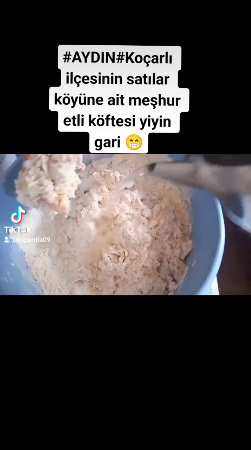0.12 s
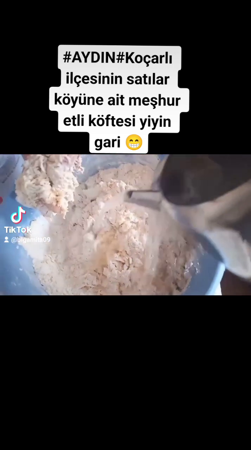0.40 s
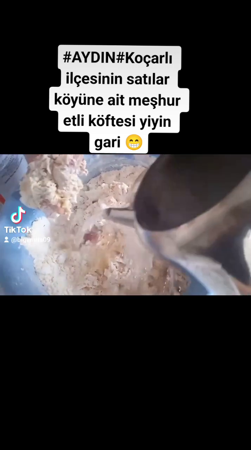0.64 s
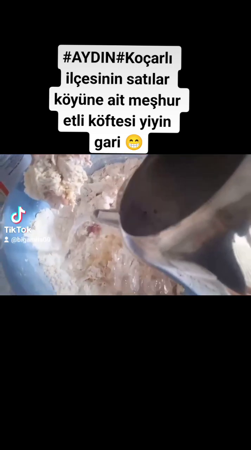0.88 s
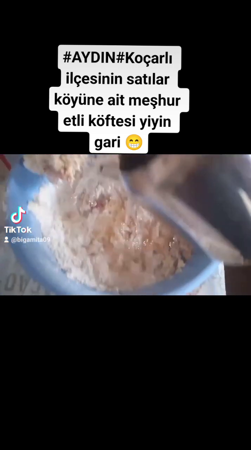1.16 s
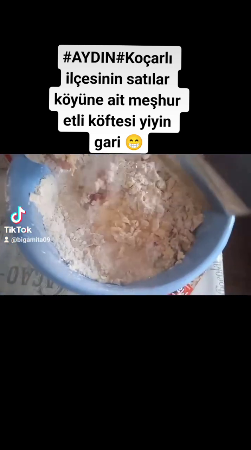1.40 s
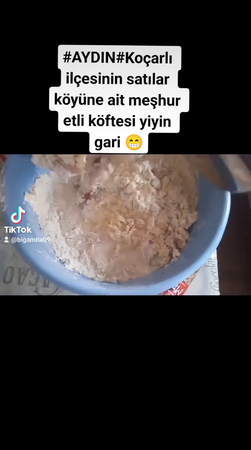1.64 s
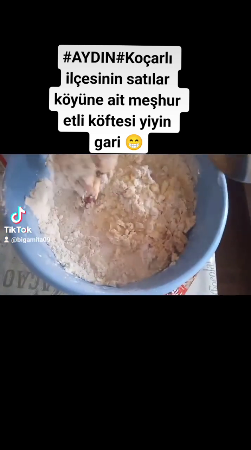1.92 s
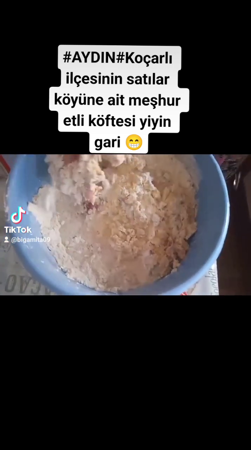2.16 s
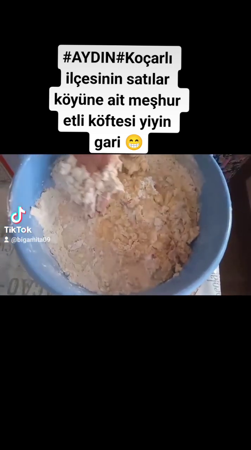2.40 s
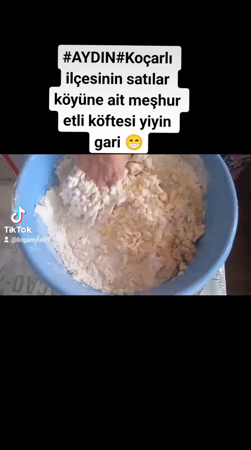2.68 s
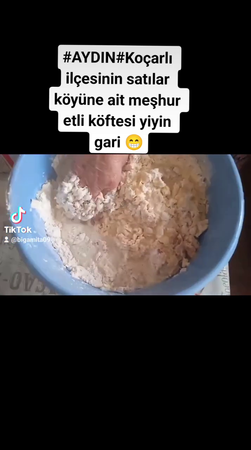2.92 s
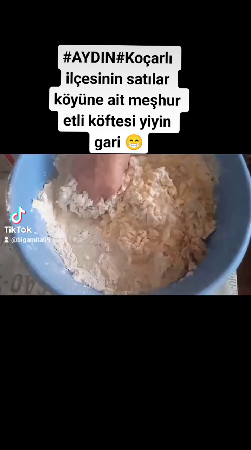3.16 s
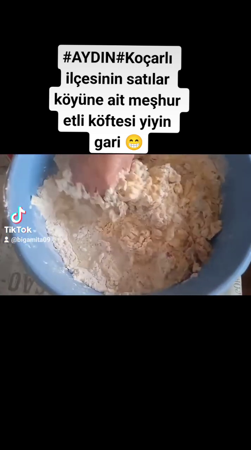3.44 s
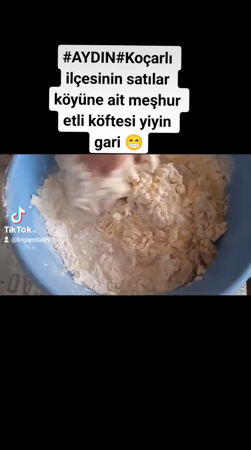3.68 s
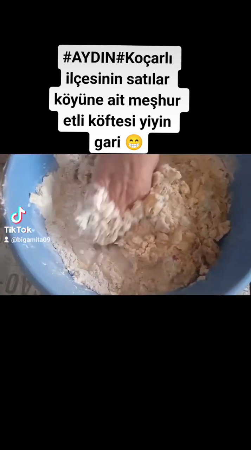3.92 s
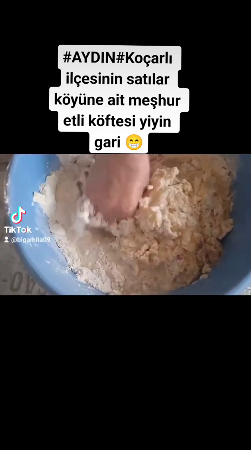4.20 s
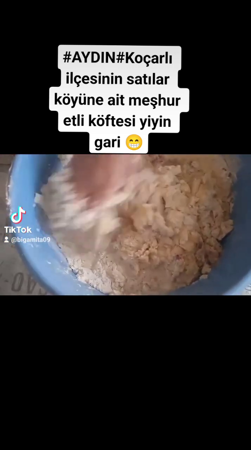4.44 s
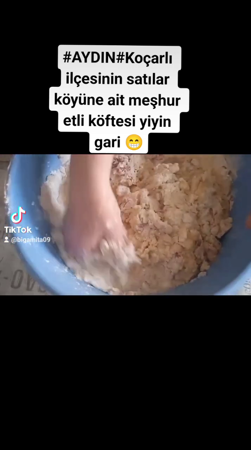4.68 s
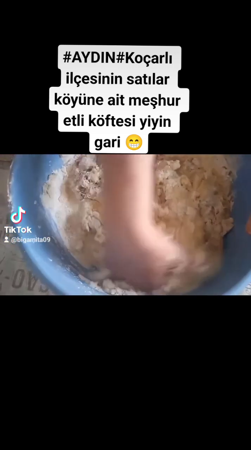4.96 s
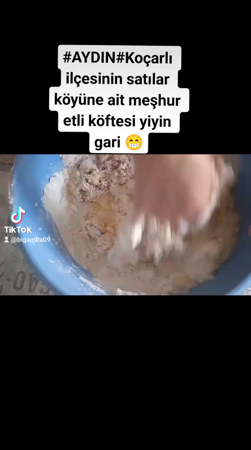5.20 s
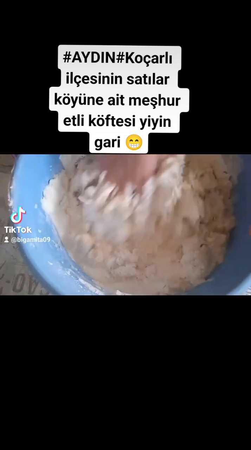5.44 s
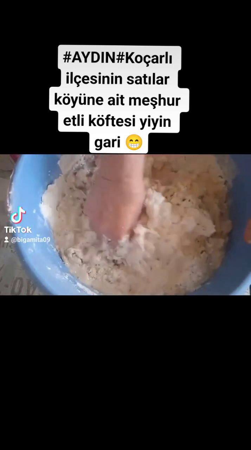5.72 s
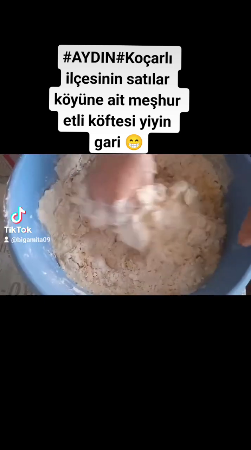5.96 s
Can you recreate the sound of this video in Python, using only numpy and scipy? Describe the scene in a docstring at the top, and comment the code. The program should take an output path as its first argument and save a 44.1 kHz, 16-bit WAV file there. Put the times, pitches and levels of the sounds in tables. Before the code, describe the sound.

A light, crackly pour of water onto flour peaks within the first second and dwindles into sparse, high, clicking drips. After a short lull a kettle lands across the room with woody thuds, then a brighter metallic clank and a little scraping. Quiet dry rubbing and sticky ticks follow close by as dough is mixed, the hand bumping the plastic bowl. Close phone microphone, short kitchen reflections, low wavering hum.

```python
"""In a kitchen, heard close to a phone: water from a metal kettle spatters on flour in a plastic bowl, as
bursts of filtered noise, bubbles and single drops. Across the room the kettle is set down on a counter and
rocks: struck modes, rattling and sliding noise. Then a hand rubs through the crumbly dough, as grainy hiss and
small cracks, and bumps the bowl, which rings briefly. Reflections, air noise and a low wavering hum lie behind.
"""
import sys
import numpy as np
from scipy import signal
from scipy.io import wavfile
from scipy.ndimage import uniform_filter1d

SR = 44100
rng = np.random.default_rng(int(sys.argv[2]) if len(sys.argv) > 2 else 0)


def transcribe(signal):
    """Save signal, clipped to [-1, 1], as a 16-bit WAV file at the path in sys.argv[1]."""
    frames = np.atleast_2d(signal).T
    limited = np.clip(frames, -1, 1)
    pcm = np.round(limited * 32767).astype(np.int16)
    wavfile.write(sys.argv[1], SR, pcm)


def to_linear_factor(level_db):
    """Convert decibel levels (scalar or array-like) to linear amplitude factors."""
    exponent = np.asarray(level_db, float) / 20
    return 10 ** exponent


N = 268083  # length in samples

# Close by: the water while it pours and drips, then from about 2.1 s a faint low rustle.
# Each row: time in seconds, spray level in dB, fine spray above 8 kHz in dB, gurgle level in dB.
POUR = [(0.0, -69.5, -70, -78), (0.12, -66, -65.5, -85), (0.31, -64, -67.5, -72), (0.46, -59, -60.5, -73),
        (0.71, -59.5, -65, -66.5), (0.86, -56, -61, -68.5), (0.9, -62.5, -69, -79),
        (0.98, -57.5, -70, -66.5), (1.08, -62, -64.5, -78), (1.3, -70.5, -66, -75),
        (1.49, -70.5, -71.5, -79), (1.66, -84, -77.5, -80), (1.9, -85, -92, -88), (2.02, -83, -80, -88),
        (2.1, -98, -104, -82), (2.3, -79, -103, -76.5), (2.6, -84, -88, -80)]
# Colour of the spray on flour. Each row: frequency in Hz, level in dB.
SPRAY_COLOUR = [(500, -27.5), (1000, -20), (2500, -8.5), (4000, -8.5), (6000, -5.5), (10000, -6.5),
                (16500, -12.5)]
# The clearest drops bursting. Each row: time in seconds, level in dB, starting pitch in Hz,
# broad snap relative to the bubble in dB.
DROPS = [(0.055, -50.5, 5800, 5), (0.0733, -52, 5650, 13.5), (0.1388, -44.5, 5960, -5),
         (0.188, -48.5, 5960, 2), (0.2172, -45, 3180, 10), (0.2853, -37.5, 9800, -12),
         (0.3044, -52, 2180, 8), (0.3184, -50.5, 2930, 13.5), (0.376, -53, 6300, 7), (0.482, -46, 2790, 15),
         (0.509, -42, 5400, 0), (0.5507, -50, 6500, 10), (0.602, -45.5, 6650, 11), (0.6437, -38, 2110, -4),
         (0.6527, -31.5, 6390, 0.5), (0.704, -45.5, 2540, 12.5), (0.7554, -41, 5890, 5.5),
         (0.7886, -48, 2900, -7), (0.808, -45.5, 3100, -3), (0.907, -32.5, 6700, 2),
         (0.9591, -36.5, 5700, -19), (0.99, -39, 5700, -14), (1.0224, -27.5, 6360, -23),
         (1.061, -41.5, 5750, 1), (1.117, -31, 6250, -18), (1.177, -35.5, 15200, 0), (1.2343, -50, 6150, 8),
         (1.295, -40, 14700, -19), (1.448, -28.5, 14800, -20), (1.5395, -52.5, 6400, 7.5),
         (1.6012, -59.5, 2470, 9), (1.6885, -47, 6220, -1), (1.858, -52, 15100, -8),
         (1.9043, -38, 14800, -5), (1.9628, -64, 6560, 9), (1.989, -59.5, 3900, 10.5),
         (2.061, -62, 2400, -13)]

# Close by: strokes of the hand through the dough. Each row: start in seconds, length in seconds,
# share of the length until fullest, rubbing level in dB, fine hiss above 8 kHz in dB.
STROKES = [(3.615, 0.25, 0.61, -64, -84), (3.894, 0.041, 0.12, -64.5, -84), (3.997, 0.13, 0.35, -70.5, -80),
           (4.193, 0.09, 0.22, -59.5, -68), (4.272, 0.52, 0.27, -60.5, -65), (4.777, 0.081, .3, -72.5, -87),
           (4.998, 0.086, 0.77, -65, -73), (5.059, 0.36, 0.57, -66, -77), (5.615, 0.081, 0.55, -70, -71.5),
           (5.791, 0.58, 0.46, -62.5, -63.5)]
# Colour of the rubbing. Each row: frequency in Hz, level in dB.
RUB_COLOUR = [(200, -34.5), (400, -25), (600, -13), (830, -5.5), (1300, -16.5), (2570, -9), (4000, -10.5),
              (6000, -11.5), (11000, -8.5), (16500, -10.5)]
# The clearest crumbs cracking and sticky dough letting go. Each row: time in seconds, level in dB,
# starting pitch in Hz, broad snap relative to the bubble in dB.
CRUMBS = [(3.1452, -61, 3500, 22), (3.2187, -43.5, 6300, -4), (3.2635, -43.5, 5030, -7),
          (3.423, -64, 6180, 8), (3.5548, -57, 6390, 7), (3.6405, -61, 6200, 4), (3.7294, -54, 5600, -2),
          (3.7793, -59, 6460, 5), (3.8873, -50, 4950, -7), (3.8997, -51, 4840, 0), (3.9354, -50, 4750, -3),
          (3.9918, -52, 6130, -1), (4.0232, -47, 6730, -1), (4.0658, -59, 6600, 16), (4.1948, -57, 6600, 2),
          (4.2114, -40.5, 6970, 2), (4.582, -49.5, 3720, 1), (4.7965, -57.5, 3640, 3),
          (4.8094, -54, 6200, 1), (4.8214, -51, 6060, -1), (5.0661, -48.5, 6430, -2), (5.143, -53, 6520, 1),
          (5.1952, -52, 6400, -5), (5.214, -54.5, 5700, 6), (5.2634, -53, 5800, 4),
          (5.2727, -53.5, 5430, 6), (5.3817, -61, 5700, 8), (5.4165, -61, 6410, 5), (5.5148, -64, 6350, 14),
          (5.5617, -65, 6640, 9), (5.6445, -49.5, 6100, 2), (5.7159, -54.5, 5900, 5),
          (5.8142, -56, 3850, 10), (5.867, -53, 15200, -10)]
# Colour of the cracks. Each row: frequency in Hz, level in dB.
CRACK_COLOUR = [(1000, -52), (3000, -24), (6000, 0), (16500, -2.5)]

# Close by: knuckles and lumps against the bowl. Each row: time in seconds, peak level in dB,
# favoured pitch in Hz, fall in dB half an octave away from it.
BUMPS = [(1.2343, -51, 900, 21), (4.035, -56, 740, 4), (4.211, -34.5, 1350, -1.5), (4.309, -51.5, 900, 17),
         (4.708, -45, 1010, 26), (5.080, -57, 800, 13.5), (5.973, -55, 800, 11)]
# Modes of the plastic bowl. Each row: frequency in Hz, relative level in dB, 60 dB decay in seconds.
BOWL_MODES = [(710, -29, 0.09), (778, 4, 0.029), (900, 13, 0.01), (1260, -4.5, 0.0066), (1280, 13.5, 0.011),
              (1666, 2, 0.039), (2400, 16.5, 0.0057), (3000, -20, 0.03)]

# Across the kitchen: the kettle meeting the counter. Each row: time in seconds, counter level in dB,
# kettle body level in dB, clatter level in dB, contact time in ms.
KNOCKS = [(2.256, -56.5, -87, -69.5, 1.9), (2.640, -28.5, -37, -42, 4.1), (2.671, -42, -38.5, -43.5, 6.7),
          (2.726, -30.5, -40.5, -45.5, 4), (2.758, -48.5, -62.5, -48, 4.5), (3.027, -32, -19.5, -26.5, 1.4),
          (3.043, -27, -23, -30.5, 1), (3.267, -44.5, -71, -73, 6.6), (3.53, -43, -55, -51, 5.6),
          (3.555, -46, -50, -51, 3.5)]
# Kettle base sliding on the counter. Each row: start in seconds, length in seconds,
# share of the length until fullest, level in dB.
SLIDES = [(2.769, 0.14, 0.42, -67), (2.978, 0.093, 0.51, -62), (3.186, 0.16, .58, -55.5),
          (3.4, .11, 0.56, -71), (3.526, 0.11, 0.4, -64)]
# Colour of the sliding, with a few peaks for the body's modes. Each row: frequency in Hz, level in dB.
SCRAPE_COLOUR = [(500, -27), (800, -11.5), (946, 1), (1100, -7), (1900, -7.5), (2150, 1.5), (2350, -6),
                 (2570, -3.5), (2900, -12), (4000, -15.5), (6500, -14.5), (9000, -20.5), (16500, -27)]
# Modes of the counter, the kettle's body and its rim.
# Each row: frequency in Hz, relative level in dB, 60 dB decay in seconds.
COUNTER_MODES = [(129.2, -18, 0.12), (161.2, -10.5, 0.19), (230, -5.5, 0.061), (283.7, -4.5, 0.24),
                 (317.5, -4, 0.25), (408, 3.5, 0.084), (537, 6.5, 0.032), (681, 9.5, 0.025),
                 (828, -7, 0.11), (953, 0.5, 0.05)]
BODY_MODES = [(950, -17, 0.033), (1037, -8.5, 0.12), (1128, -0.5, 0.07), (1213, 2, 0.19),
              (1280, -15.5, 0.18), (1314, 10, 0.018), (1524, -4, 0.071), (1514, 5, 0.035),
              (1580, -9, 0.091), (1760, -3.5, 0.083), (1856, -18, 0.17), (2035, -9, 0.104),
              (1937, -13, 0.094), (2380, -14, 0.28), (2910, -13, 0.096), (3800, -17, 0.079),
              (4770, -24, .06), (5500, -45, .08), (5960, -16.5, .08), (6300, -13.5, 0.065),
              (8100, -21.5, 0.15)]
RIM_MODES = [(4373, 3, 0.15), (4840, -5, 0.16), (6390, -11, .12), (7070, -4, .1), (9200, -3, .06),
             (10100, -5, .08)]
# Colour of the loose rattle before the contact tilts it. Each row: frequency in Hz, level in dB.
CLATTER_COLOUR = [(80, -39), (140, -9), (300, -22), (1000, -10), (2700, -14), (3200, -23.5), (6200, -29),
                  (8900, -34), (16500, -51)]

# Reverberation of the kitchen. Each row: frequency in Hz, 60 dB decay in seconds.
KITCHEN_DECAY = [(150, 0.46), (500, 0.34), (1500, 0.26), (4000, 0.31), (10000, 0.11)]
# Colour of the air noise. Each row: frequency in Hz, level in dB.
AIR_COLOUR = [(30, -13), (60, -4), (177, -5), (300, -9), (620, -14.5), (1400, -16), (2500, -18),
              (4000, -29.5), (7000, -28.5), (9000, -31), (16500, -30)]
# Low hum. Each row: frequency in Hz, width in Hz, steady level in dB.
HUM = [(64.7, 3.9, -90), (129, 4.4, -83.5), (177, 9.9, -84.5)]
# The hum swells now and then. Each row: start in seconds, length in seconds, row of HUM from 0, level in dB.
HUM_SWELLS = [(0.13, 1.27, 0, -70.5), (0.72, 1.2, 1, -76.5), (1.27, 0.55, 2, -84), (2.07, 0.38, 1, -80),
              (2.08, 2.5, 2, -77.5), (2.65, 0.63, 1, -70), (3.1, 0.42, 0, -75), (4.155, 0.61, 1, -82),
              (3.1, 1.5, 0, -83), (1.8, 0.46, 0, -79)]
# Response of the microphone. Each row: frequency in Hz, gain in dB.
MICROPHONE = [(15, -52), (45, -8), (70, 0.5), (150, 0.5), (3000, 1.5), (3800, -2.5), (5000, -0.5),
              (6300, 2.5), (7400, -2.5), (7900, -9), (13800, -10), (14800, 2), (15600, 1.5), (15950, -25),
              (17000, -39)]


def water():
    """Dense spray of tiny bursts, low bubbling gurgle, clear drops and droplets; a faint rustle at the end."""
    spray_db, fine_db, gurgle_db = curves(POUR)
    spray = through(grains(95, spread_db=2.0, cycles=3.8, share=0.89, clump_db=4.5), SPRAY_COLOUR)
    t = np.arange(1500) / SR
    gurgle = np.zeros(N)
    for hz in np.geomspace(360, 1300, num=16):
        # each bubble rises in pitch as it nears the surface
        bubble = np.sin(2 * np.pi * hz * t * (1 + 1.5 * t)) * t * np.exp(-t * hz / 1.18) * hz ** 1.27
        births = rng.exponential(1, N) * (rng.random(N) < 70 / SR)  # about 70 a second at each pitch
        gurgle += signal.oaconvolve(births, bubble)[:N]
    dripping_s = (POUR[0][0], DROPS[-1][0])
    # droplet levels follow the spray
    droplets = scattered(dripping_s, spray_db + 5, span_hz=(2600, 7500), spread_db=5.0, count=36)
    drops = ticks(DROPS + droplets, SPRAY_COLOUR, cycles=4.2, splash_share=0.7, splash_ms=2.22)
    return brightened(spray, to_linear_factor(spray_db), to_linear_factor(fine_db)) + to_linear_factor(gurgle_db) * evened(gurgle) + drops


def hand():
    """Dry flour hisses under the palm in swelling strokes of grainy noise, and crumbs crack as short ticks."""
    low = sum(to_linear_factor(db) * arch(*stroke, roundness=0.65) for *stroke, db, _ in STROKES)
    # the fine hiss keeps closer to the height of each stroke
    fine = sum(to_linear_factor(db) * arch(*stroke, roundness=0.78) for *stroke, _, db in STROKES)
    rub = through(grains(120, spread_db=6.0, cycles=3.3, share=0.2, clump_db=2), RUB_COLOUR)
    kneading_s = (3.15, 6.05)
    small = scattered(kneading_s, np.full(N, -62), span_hz=(5060, 7020), spread_db=2.5, count=30)
    cracks = ticks(CRUMBS + small, CRACK_COLOUR, cycles=2.57, splash_share=0.38, splash_ms=2.1)
    return brightened(rub, low, fine) + cracks


def bowl():
    """Short plastic rings; a soft lump wakes only the modes near one pitch."""
    out = np.zeros(N)
    for s, db, centre_hz, fall_db in BUMPS:
        woken = []
        for hz, mode_db, t60 in BOWL_MODES:
            half_octaves = 2 * np.log2(hz / centre_hz)
            woken.append((hz, mode_db - fall_db * half_octaves ** 2, t60))
        add(out, s, to_linear_factor(db) * ring(woken, contact_ms=0.34, scatter=0.58))
    return out


def kettle():
    """Every contact rings the counter and the kettle's body, with a rattle of loose metal; it also slides."""
    out, t = np.zeros(N), np.arange(6000) / SR
    # a landing rings the rim, which takes up the blow slowly
    add(out, 2.64, to_linear_factor(-51) * ring(RIM_MODES, contact_ms=13, rough=0.18))
    for s, counter_db, body_db, clatter_db, contact_ms in KNOCKS:
        tilt_db = 0.17 - 1.5 * contact_ms  # treble per octave falls as the contact lengthens
        add(out, s, to_linear_factor(counter_db) * ring(COUNTER_MODES, contact_ms, rough=0.9))
        add(out, s, to_linear_factor(body_db) * ring(BODY_MODES, contact_ms, tilt_db, rough=1.1))
        tilted = [(hz, db + 0.6 * tilt_db * np.log2(hz / 1000)) for hz, db in CLATTER_COLOUR]
        rattle = signal.oaconvolve(rng.standard_normal(6000), colour(tilted))[:6000]
        onset = 1 - np.exp(-t * 4000 / contact_ms)
        fade = np.exp(-t * 1000 / (contact_ms + 14))
        add(out, s, to_linear_factor(clatter_db) * evened(rattle) * fade * onset)
    slide = sum(to_linear_factor(db) * arch(*move, roundness=1.5) for *move, db in SLIDES)
    return out + slide * through(rng.standard_normal(N), SCRAPE_COLOUR)


def kitchen(x):
    """Sparse reflections of random sign, each band dying at its own speed."""
    taps = np.zeros(SR // 2)
    at = np.arange(200, len(taps) - 20, 20)
    taps[at + rng.integers(0, 20, len(at))] = rng.choice([-1., 1.], len(at))
    hz, t, z = signal.stft(taps, SR, nperseg=256)
    fade = to_linear_factor(-60 * t / read(KITCHEN_DECAY, hz)[:, None])
    tail = signal.istft(z * fade, SR, nperseg=256)[1]
    return signal.fftconvolve(x, tail / np.linalg.norm(tail))[:N]


def room_tone():
    """Steady air noise and a wavering low hum of narrow noise bands that swell now and then."""
    air = to_linear_factor(-71.5) * through(rng.standard_normal(N), AIR_COLOUR)
    levels = [to_linear_factor(db) * np.ones(N) for *_, db in HUM]
    for start, length, tone, db in HUM_SWELLS:
        levels[round(tone)] += to_linear_factor(db) * arch(start, length, fullest=0.37, roundness=0.98)
    hum = sum(level * fuzzy_tone(hz, width_hz) for level, (hz, width_hz, _) in zip(levels, HUM))
    return air + hum


def ticks(rows, spectrum, cycles, splash_share, splash_ms):
    """Each tick is a tiny bubble of a few cycles and a broad snap, among a few smaller droplets or crumbs."""
    out, t = np.zeros(N), np.arange(1500) / SR
    snap = colour(spectrum)[:300]
    snap = snap / abs(snap).max()
    lead = 2e-3  # seconds by which the smaller bits begin ahead
    for s, db, hz, snap_db in rows:
        u = t * hz / max(cycles, .5)
        bubble = np.exp(-((u - 1) / 0.5) ** 2) * np.sin(2 * np.pi * hz * t * (1 + 0.018 * u))
        v = t[:600] * 1000 / splash_ms
        small = rng.standard_normal(600) * (rng.random(600) < .035) * v * np.exp(1 - v)
        add(out, s + lead / 3, to_linear_factor(db) * bubble)
        add(out, s + lead / 2, to_linear_factor(db + snap_db) * snap)
        splash = splash_share * signal.oaconvolve(small, snap)
        add(out, max(s - lead, 0), to_linear_factor(db + snap_db) * splash)
    return out


def scattered(span, level_db, span_hz, spread_db, count):
    """Tick rows at random moments, pitches and sizes about a level."""
    when, pitch, size, snap = rng.random((count, 4)).T
    s = span[0] + when * (span[1] - span[0])
    hz = span_hz[0] + (span_hz[1] - span_hz[0]) * np.sqrt(pitch)  # more of them high than low
    db = level_db[(s * SR).astype(int)] - spread_db * np.log(size + 0.031)  # a few far stronger
    return list(zip(s, db, hz, 8 * snap - 4))


def grains(per_s, spread_db, cycles, share, clump_db):
    """Hiss mixed with tiny bursts of a few cycles at scattered pitches; their level swells in clumps."""
    slow = uniform_filter1d(uniform_filter1d(rng.standard_normal(N), size=300), size=300)
    clumps = to_linear_factor(clump_db * evened(slow))
    t, out = np.arange(400) / SR, np.zeros(N)
    for hz in np.geomspace(600, 16000, num=28):
        u = t * hz / cycles
        burst = np.sqrt(hz) * u * np.exp(-2 * u) * np.sin(2 * np.pi * hz * t)
        struck = rng.random(N) < per_s * np.sqrt(hz / 6000) / SR  # per_s holds at 6 kHz
        size = to_linear_factor(spread_db * np.minimum(rng.exponential(1, N), 4)) * struck
        out += signal.oaconvolve(size, burst)[:N]
    share = np.clip(share, 0, 1)  # of the power
    return np.sqrt(share) * evened(out * clumps) + np.sqrt(1 - share) * rng.standard_normal(N)


def ring(modes, contact_ms, tilt_db=0, rough=0, scatter=1):
    """Modes that swell during the contact and die away, peak 1; tilt_db per octave weighs them about 1 kHz."""
    t = np.arange(SR // 2) / SR
    luck_db = rng.standard_normal(len(modes))
    phases = scatter * rng.random(len(modes))  # in turns
    tones = np.zeros(len(t))
    for (hz, db, t60), luck, phase in zip(modes, luck_db, phases):
        smooth = round(4 * SR / np.sqrt(hz * 100))  # samples
        shaking = evened(uniform_filter1d(rng.standard_normal(len(t)), size=smooth))
        chatter = 1 + rough * min(1, 0.094 / t60) * shaking  # loose contact blurs the damped modes most
        level_db = db + 1.5 * luck + tilt_db * np.log2(hz / 1000) - 60 * t / t60
        tones += chatter * to_linear_factor(level_db) * np.sin(2 * np.pi * (hz * t + phase))
    sound = tones * (1 - np.exp(-t * 1000 / max(contact_ms, .05))) ** 2
    return sound / abs(sound).max()


def fuzzy_tone(hz, width_hz, steady=0.88):
    """Noise in a narrow resonance, its level partly evened out."""
    r = np.exp(-np.pi * width_hz / SR)
    slow = signal.lfilter([1], [1, -2 * r, r * r], rng.standard_normal((N, 2)) @ [1, 1j])
    slow = slow / (abs(slow) + steady * abs(slow).mean())
    return evened((slow * np.exp(2j * np.pi * hz * np.arange(N) / SR)).real)


def arch(start, length, fullest, roundness):
    """Rises to 1 at a share of the length and sinks again."""
    u = np.clip((np.arange(N) / SR - start) / length, 0, 1)
    bend = np.log(.5) / np.log(np.clip(fullest, .05, .95))
    return abs(np.sin(np.pi * u ** bend)) ** roundness * (u < 1)


def brightened(x, low, fine):
    """Sets the levels below and above 8 kHz apart."""
    high_pass = signal.butter(N=4, Wn=8000, btype="high", fs=SR, output="sos")
    top = signal.sosfiltfilt(high_pass, x)
    return low * (x - top) + fine * evened(top)


def evened(x):
    """Scales a sound to an rms of 1."""
    return x / np.sqrt(np.mean(x ** 2) + 1e-20)


def read(points, hz):
    """Reads a table of frequencies and values along a logarithmic frequency scale."""
    f, value = np.transpose(points)
    return np.interp(np.log(hz + 1), np.log(f + 1), value)


def curves(table):
    """Columns of a table at every sample; -120 dB outside its span."""
    s, *columns = np.transpose(table)
    return [np.interp(np.arange(N) / SR, s, c, left=-120, right=-120) for c in columns]


def add(mix, s, sound):
    """Lays a sound into the mix from s seconds on."""
    part = mix[round(s * SR):][:len(sound)]
    part += sound[:len(part)]


def colour(spectrum, size=2048):
    """Causal, minimum-phase impulse response of a spectrum."""
    gain_db = read(spectrum, abs(np.fft.fftfreq(size, 1 / SR)))
    log_gain = np.log(to_linear_factor(np.maximum(gain_db, -100)))
    return np.fft.ifft(np.exp(np.conj(signal.hilbert(log_gain)))).real[:size // 2]


def through(x, spectrum):
    """Colours a sound with a spectrum, at an rms of 1."""
    return evened(signal.oaconvolve(x, colour(spectrum))[:N])


def scene():
    """The far kettle excites the room more strongly than the near sounds at the bowl."""
    far, near, bumps = kettle(), water() + hand(), bowl()
    wet = kitchen(to_linear_factor(-5) * far + to_linear_factor(-11) * near + to_linear_factor(-11) * bumps)
    return (far + near + bumps + wet + room_tone())[None]


def low_pass(x):
    """Removes everything above the highest recorded frequency."""
    return signal.sosfilt(signal.butter(12, 16790, fs=SR, output="sos"), x)


def record(dry):
    """The phone's microphone colours the whole scene."""
    heard = signal.oaconvolve(dry, colour(MICROPHONE)[None], axes=1)[:, :N]
    return low_pass(heard)


dry = scene()
out = record(dry)
transcribe(out)
```